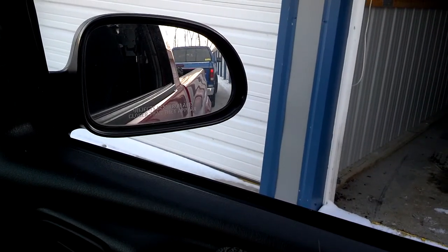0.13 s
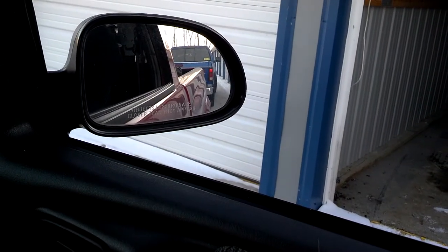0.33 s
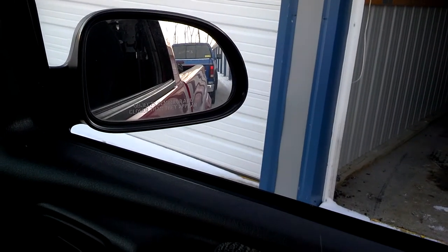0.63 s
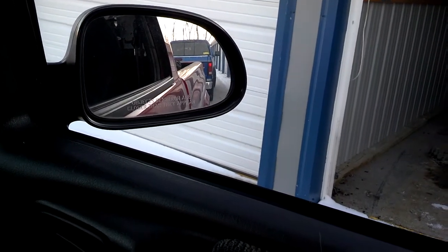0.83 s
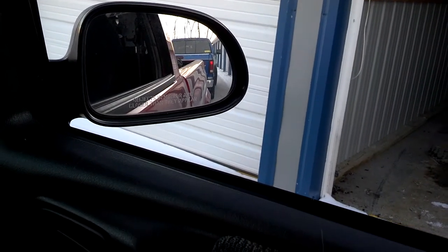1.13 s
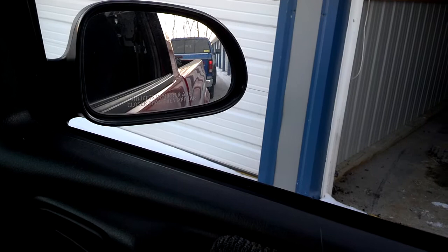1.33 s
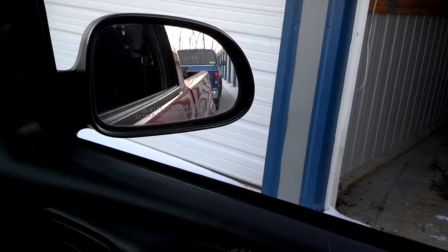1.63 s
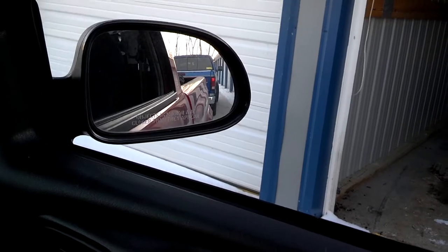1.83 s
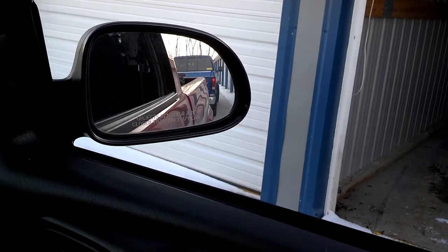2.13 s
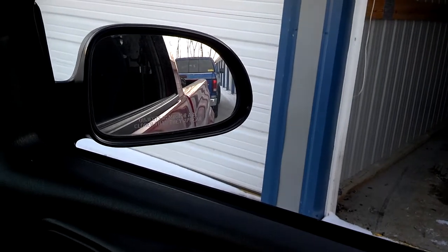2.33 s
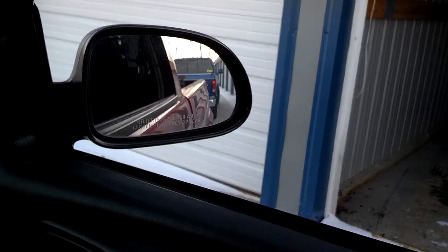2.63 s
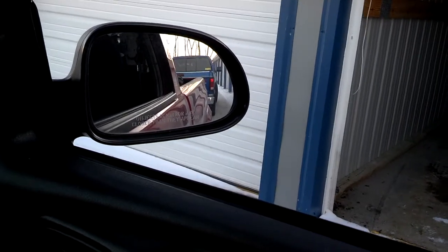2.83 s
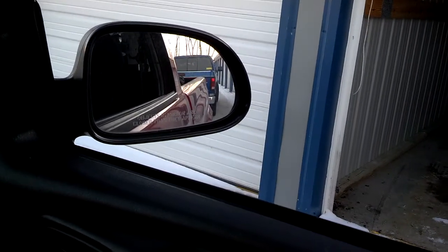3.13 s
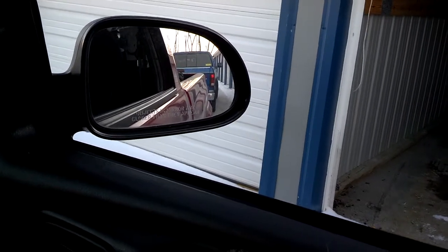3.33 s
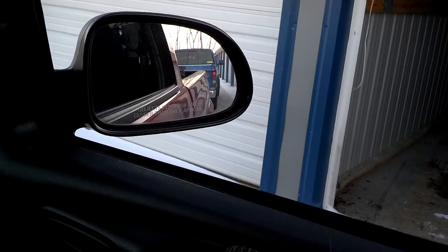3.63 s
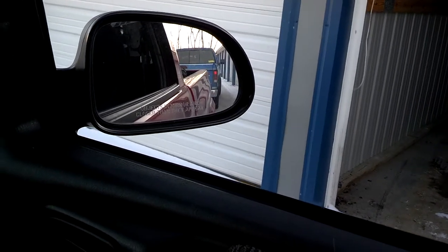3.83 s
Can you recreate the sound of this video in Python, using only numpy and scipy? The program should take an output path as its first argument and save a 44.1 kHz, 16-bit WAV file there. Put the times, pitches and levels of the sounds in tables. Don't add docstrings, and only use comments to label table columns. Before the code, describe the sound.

Truck engine heard from the cab: lumpy idle, brief throttle blip, then strong growling revs easing off.

```python
import sys
import numpy as np
from scipy import signal
from scipy.fft import rfft, irfft, next_fast_len
from scipy.io import wavfile
from scipy.ndimage import uniform_filter1d, map_coordinates

SR = 44100
rng = np.random.default_rng(int(sys.argv[2]) if len(sys.argv) > 2 else 0)


def wav_record(signal):
    frames = np.transpose(np.atleast_2d(signal))
    bounded = np.clip(frames, -1, 1)
    quanta = np.round(bounded * 32767).astype(np.int16)
    wavfile.write(sys.argv[1], SR, quanta)


def decibels_to_gain(level_db):
    exponent = np.asarray(level_db, float) / 20
    return 10 ** exponent


N = 176400

# t/s, cycle rate/Hz
ENGINE_SPEED = [(0, 15.7), (.25, 14.6), (.45, 10), (1.05, 10.2), (1.27, 12.5), (1.7, 12.65), (2.0, 13.9),
                (2.14, 14.5), (2.37, 14.3), (2.5, 19.5), (2.62, 26.3), (2.76, 32.3), (2.88, 33.4),
                (3.0, 36.2), (3.13, 40), (3.25, 38.1), (3.5, 32.8), (3.75, 28.1), (4, 24.5)]
# t/s, level/dB
EXHAUST_LOAD = [(0.0, -26), (0.06, -24), (0.3, -33), (0.53, -41), (0.56, -35.5), (0.67, -41), (1.07, -33.5),
                (1.1, -21.5), (1.17, -20), (1.46, -26.5), (2.13, -19), (2.15, -23), (2.53, -16),
                (2.8, -21.5), (3.05, -16), (3.12, -20.5), (3.17, -18.5), (3.9, -21), (4.0, -23)]
# t/s, level/dB
GAS_FLOW = [(0, -60), (.8, -60.5), (1.06, -55.5), (1.13, -40), (1.25, -41), (1.55, -57), (2.36, -57),
            (2.45, -46.5), (2.66, -38), (2.82, -50.5), (2.93, -51), (3.05, -38), (3.17, -44), (3.24, -30.5),
            (3.33, -36.5), (3.41, -43.5), (3.72, -50), (4, -41.5)]
# t/s, unevenness/1
UNEVENNESS = [(0, .45), (.4, .7), (1.05, 1.1), (1.35, .5), (2.35, .4), (2.6, .4), (4, .5)]
BANK_PATTERN = [-3, -4, 0, 1, -7, 2, -3, -3]
# order/1, start t/s, end t/s, level/dB
SINGING_ORDERS = [(9, -.2, .4, 8), (10, -.2, .25, 7), (12, -.2, .42, 6), (8, -.2, .3, 5),
                  (14, 1.05, 1.36, 13), (5, 1.45, 2.4, 5), (8, 1.3, 2.4, 5), (18, 1.75, 2.4, 7),
                  (21, 1.5, 2.4, 6), (8, 2.33, 2.66, 15), (8, 2.62, 2.82, 8), (10, 2.8, 3.1, 19),
                  (3, 2.92, 3.2, 8), (7, 2.88, 3.12, 11), (5, 2.75, 3.15, 6), (11, 3.05, 3.5, 11),
                  (4, 3.18, 3.4, 9), (6, 3.1, 3.4, 5), (5, 3.12, 3.4, 5), (5, 3.3, 3.9, 4),
                  (3, 3.5, 4.2, 7), (6, 3.7, 4.2, 6)]
# f/Hz, level/dB
PIPE_TONE = [(25, -22), (55, -23.5), (110, -5.5), (160, 1.5), (200, 0.5), (260, -4.5), (330, -7.5),
             (450, -5), (1000, -62.5)]
# f/Hz, width/Hz, level/dB
WALL_PEAKS = [(355, 15, -3.5), (455, 12.5, 6), (528, 13, 3.5), (561.7, 5.4, 7), (674, 5.9, -5.5),
              (740, 3.2, -3), (796.5, 5.1, 2), (853, 11.4, 2.5), (994, 16, 1), (1161, 14, -9.5),
              (1214, 14.6, 1), (1405, 4.8, 5), (1682, 7.5, 1.5), (1990, 3.1, 5), (428, 11.4, 0)]
# f/Hz, level/dB
ROAR_TONE = [(90, -78), (200, -2.5), (450, -5), (1300, -7.5), (1900, -20), (2400, -19.5), (4600, -32.5),
             (6000, -42)]
# f/Hz, level/dB
HISS_TONE = [(500, -34.5), (1500, -1.5), (4400, -7.5), (5600, -13.5), (9500, -16.5), (12000, -23),
             (16000, -17.5)]
# t/s, peak level/dB, time to fall 60 dB/s
FUEL_POPS = [
    (0.299, -56, .12),
    (0.8704, -48, .3),
    (1.0844, -43, .2),
    (1.103, -40, .3),
    (2.4302, -42, .1),
    (3.469, -39, .12),
    (3.7986, -39, .1),
    (3.915, -39, .15),
]
# f/Hz, level/dB
POP_TONE = [(30, -11), (500, -9), (1500, 4), (4000, -5), (8000, -12.5), (16000, -24)]
# start t/s, end t/s, start f/Hz, end f/Hz, level/dB
BLOWER_GLIDES = [
    (-.1, .32, 2350, 2250, -52),
    (-.05, .2, 2580, 2460, -57),
    (.26, .48, 2230, 2040, -55),
    (.46, .7, 2010, 1920, -51),
    (.64, 1.12, 1900, 1560, -54),
    (1.3, 2.3, 1900, 1580, -52),
    (1.85, 2.45, 1421, 1416, -43),
    (2.17, 2.42, 1419, 1416, -44),
    (1.12, 1.3, 1421, 1419, -39),
]
# f/Hz, level/dB
RATTLE_TONE = [(800, -22), (1200, -3), (2300, -16.5), (4600, -9.5), (5200, -24), (7000, -42)]
# f/Hz, level/dB
AIR_TONE = [(3000, -40), (6000, -15), (10000, 15), (16000, -17)]
# f/Hz, level/dB
RUMBLE_TONE = [(15, -22), (40, -6), (65, 5), (100, 9.5), (140, -34.5)]
# f/Hz, unrelated share/1
SIDES_APART = [(100, 0.51), (700, 0.43), (1200, 0.14), (1500, 0), (2100, 1), (2600, 0.078), (4000, 0)]
# f/Hz, level/dB
SIDE_LEAN = [(40, -3), (80, -4), (160, -8.5), (250, -4), (330, 3), (480, .5), (1000, 0), (16000, 0)]
# t/s, level/dB
RECORDER_TICKS = [
    (.291, -44),
    (1.0555, -38),
    (1.4232, -27),
]

WALL_DB = 5.5
ECHO_T60_S, ECHO_DB, ECHO_OWN_SHARE = .2, -9, 1.2
RUMBLE_DB, RUMBLE_BY_LOAD, RUMBLE_DB_PER_OCTAVE = -51.5, 0.78, -12
RATTLE_DB, RATTLE_FROM_S, RATTLE_MODES_DB = -37, 3.14, 4
AIR_DB, AIR_GROWTH = -52.5, 1.3
WHINE_OCTAVE_DB, WHINE_FUZZ_RAD = -7, 3.2
POP_DB = 12
HISS_DB, HISS_GATE, HISS_ROUGH_DB = 9.5, 0.097, 1
ROAR_DB, ROAR_BY_LOAD, ROAR_BY_FLOW, ROAR_DB_PER_OCTAVE, ROAR_GATE = -34, 0.56, 0.45, 3, 0.09
PULSE_DB, FIRST_FIRING = -4.5, 2.0
LOW_ORDER, HIGH_ORDER, PHASE_SPREAD_RAD = 3.4, 25, .7
WIDEN_S, WIDEN_HZ = 16 / SR, SR / 32


def seconds():
    return np.arange(N) / SR


def unit(x):
    return x / np.sqrt(np.mean(x ** 2) + 1e-20)


def along(points, hz):
    f, v = np.transpose(points)
    return np.interp(np.log(hz + 1), np.log(f + 1), v)


def curve(rows):
    return np.interp(seconds(), *np.transpose(rows))


def wobble(rate):
    knots = rng.standard_normal(int(N * rate / SR) + 4)
    return map_coordinates(knots, [np.arange(N) * rate / SR])


def colour(x, points, walls_db=0):
    m = 2 * next_fast_len(N // 2 + SR // 4)
    hz = np.fft.rfftfreq(m, 1 / SR)
    gain = decibels_to_gain(along(points, hz))
    if walls_db != 0:
        peaks = sum(decibels_to_gain(db) / (1 + (2 * (hz - centre) / width) ** 2) for centre, width, db in WALL_PEAKS)
        gain = gain * (1 + decibels_to_gain(walls_db) * peaks)
    cepstrum = irfft(np.log(np.maximum(gain, 1e-6)))
    cepstrum[1:m // 2] *= 2
    cepstrum[m // 2 + 1:] = 0
    return irfft(rfft(x, m) * np.exp(rfft(cepstrum)), m)[..., :N]


def gas():
    a, b = rfft(rng.standard_normal((2, N)))
    share = np.clip(along(SIDES_APART, np.fft.rfftfreq(N, 1 / SR)), 0, 1)
    common = np.cos(share * np.pi / 4) * a
    own = np.sin(share * np.pi / 4) * b
    return irfft([common + own, common - own], N)


def wall_echo(x):
    t = np.arange(SR // 3) / SR
    shared = rng.standard_normal(len(t))
    own = rng.standard_normal((2, len(t)))
    tail = (shared + ECHO_OWN_SHARE * own) * decibels_to_gain(-60 * t / ECHO_T60_S)
    tail = tail / np.linalg.norm(tail[0])
    return x + decibels_to_gain(ECHO_DB) * signal.fftconvolve(x[None], tail, axes=1)[:, :N]


def recorder_ticks():
    out = np.zeros(N)
    for s, db in RECORDER_TICKS:
        out[round(s * SR):][:2] = decibels_to_gain(db) * np.array([1, -.4])
    return out


def cab_rumble():
    load_db = uniform_filter1d(curve(EXHAUST_LOAD), size=4000)
    level_db = RUMBLE_DB + RUMBLE_BY_LOAD * (load_db - load_db.mean())
    level_db = level_db + RUMBLE_DB_PER_OCTAVE * np.log2(curve(ENGINE_SPEED) / 14)
    shaking = unit(colour(rng.standard_normal((2, N)), RUMBLE_TONE))
    return shaking * decibels_to_gain(level_db + 2.3 * wobble(5.06))


def panel_rattle():
    chance = uniform_filter1d(rng.standard_normal(N // 2 + 1), size=60) * np.sqrt(60)
    modes = decibels_to_gain(RATTLE_MODES_DB * chance)
    shaken = colour(gas() * decibels_to_gain(1.2 * wobble(60)), RATTLE_TONE)
    panels = irfft(rfft(shaken) * modes, N)
    fade_in = np.clip((seconds() - RATTLE_FROM_S) / .15, 0, 1)
    return decibels_to_gain(RATTLE_DB) * fade_in * unit(panels)


def rasping_air():
    rasp = decibels_to_gain(3.5 * wobble(250) + 2.5 * wobble(13))
    level_db = AIR_DB + AIR_GROWTH * (curve(GAS_FLOW) + 42)
    return unit(colour(gas() * rasp, AIR_TONE)) * decibels_to_gain(level_db)


def blower_whine():
    t, out = seconds(), 0
    for s0, s1, hz0, hz1, db in BLOWER_GLIDES:
        u = np.clip((t - s0) / (s1 - s0), 0, 1)
        phase = 2 * np.pi * np.cumsum(hz0 * (hz1 / hz0) ** u) / SR
        phase = phase + WHINE_FUZZ_RAD * (hz0 / hz1 - 1) ** .5 * wobble(70)
        swell = decibels_to_gain(db + 3 * wobble(30)) * np.sqrt(np.abs(np.sin(np.pi * u)))
        out = out + swell * (np.sin(phase) + decibels_to_gain(WHINE_OCTAVE_DB) * np.sin(2 * phase))
    return out


def fuel_pops():
    t, shape = seconds(), 0
    for s, db, t60 in FUEL_POPS:
        rise = np.clip((t - s) / .002, 0, 1)
        shape = shape + decibels_to_gain(db - 60 * np.abs(t - s) / max(t60, .02)) * rise
    return decibels_to_gain(POP_DB) * shape * unit(colour(gas(), POP_TONE, WALL_DB))


def firing_count():
    return FIRST_FIRING + np.cumsum(8 * curve(ENGINE_SPEED)) / SR


def firing_beat():
    count = firing_count()
    return np.cos(2 * np.pi * count) + np.cos(2 * np.pi * count / 8)


def exhaust_load():
    return uniform_filter1d(curve(EXHAUST_LOAD), size=1300)


def gas_hiss():
    rough = decibels_to_gain(HISS_ROUGH_DB * wobble(300) + 1.4 * wobble(14)) * (1 + HISS_GATE * firing_beat() / 2)
    return unit(colour(gas() * rough, HISS_TONE, WALL_DB)) * decibels_to_gain(HISS_DB + curve(GAS_FLOW))


def gas_roar():
    load_db, flow_db = exhaust_load(), curve(GAS_FLOW)
    drive_db = ROAR_BY_LOAD * (load_db - load_db.mean()) + ROAR_BY_FLOW * (flow_db - flow_db.mean())
    drive_db = drive_db + ROAR_DB_PER_OCTAVE * np.log2(curve(ENGINE_SPEED) / 20)
    surging = gas() * (1 + ROAR_GATE * firing_beat() / 2)
    return unit(colour(surging, ROAR_TONE, WALL_DB)) * decibels_to_gain(ROAR_DB + drive_db + wobble(12.0))


def cylinder_puffs():
    t, count, rough, out = seconds(), firing_count(), curve(UNEVENNESS), 0
    for k in range(1, 41):
        sing_db = 0
        for order, s0, s1, db in SINGING_ORDERS:
            if order == k:
                sing_db = sing_db + db * np.sin(np.pi * np.clip((t - s0) / (s1 - s0), 0, 1)) ** .5
        size = decibels_to_gain(BANK_PATTERN[k % 8] + sing_db) / (1 + (LOW_ORDER / k) ** 6 + (k / HIGH_ORDER) ** 4)
        loose = rough / (1 + sing_db / 8)
        level = size * decibels_to_gain(5 * loose * wobble(9))
        phase = 2 * np.pi * k * count / 8 + PHASE_SPREAD_RAD * rng.standard_normal()
        out = out + level * np.cos(phase + 1.6 * loose * wobble(11))
    return out


def exhaust():
    puffs = wall_echo(colour(cylinder_puffs(), PIPE_TONE))
    power = uniform_filter1d(np.mean(puffs ** 2, 0), size=6000)
    puffs /= np.sqrt(np.abs(uniform_filter1d(power, size=4000)))
    return puffs * decibels_to_gain(PULSE_DB + exhaust_load())


def scene():
    cab = cab_rumble() + panel_rattle() + rasping_air()
    engine = gas_hiss() + gas_roar() + exhaust()
    return cab + blower_whine() + fuel_pops() + engine


def band_limit(x):
    return signal.sosfilt(signal.butter(12, 15880, fs=SR, output="sos"), x)


def record(dry):
    hz = np.fft.rfftfreq(N, 1 / SR)
    turn = np.exp(.5j * 2 * np.pi * WIDEN_S * np.maximum(hz - WIDEN_HZ, 0))
    lean = decibels_to_gain(along(SIDE_LEAN, hz) / 2)
    wide = irfft(rfft(dry) * [lean * turn, 1 / (lean * turn)], N)
    return band_limit(wide + recorder_ticks())


dry = scene()
out = record(dry)
wav_record(out)
```